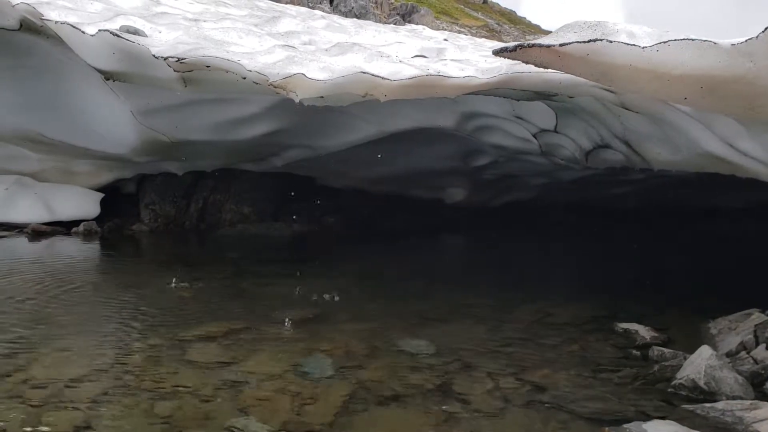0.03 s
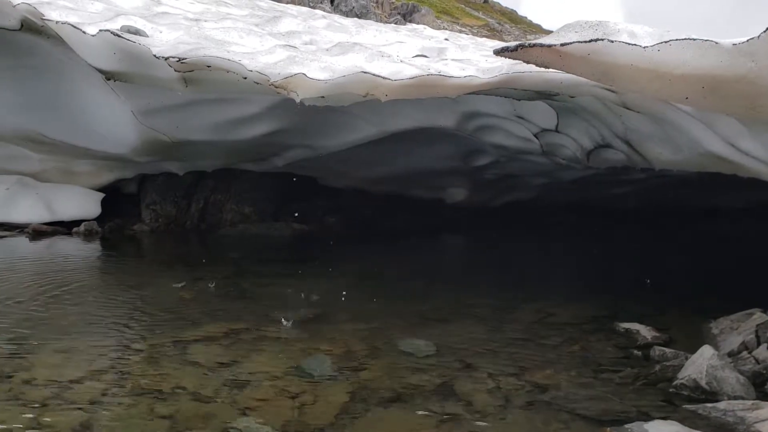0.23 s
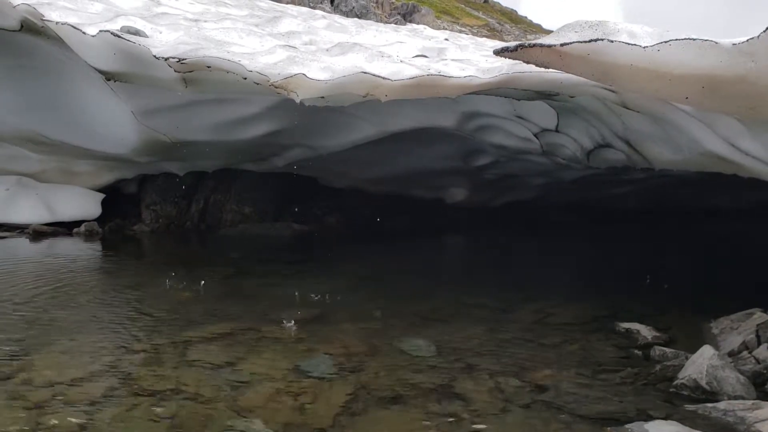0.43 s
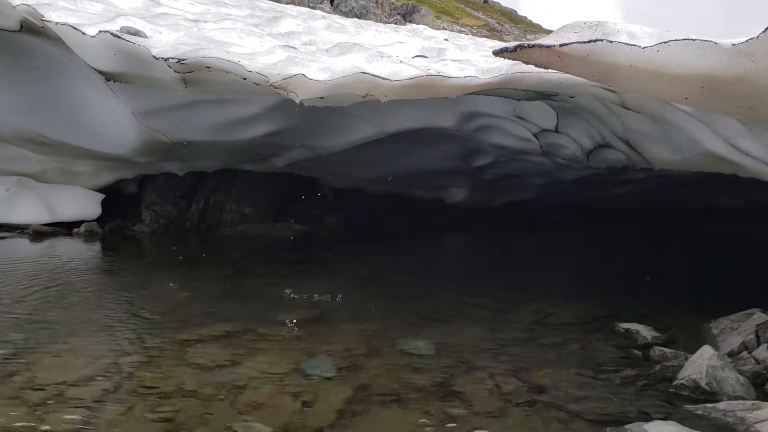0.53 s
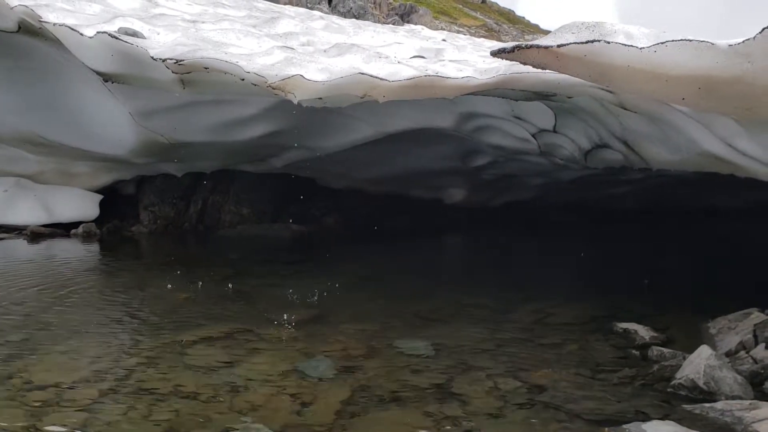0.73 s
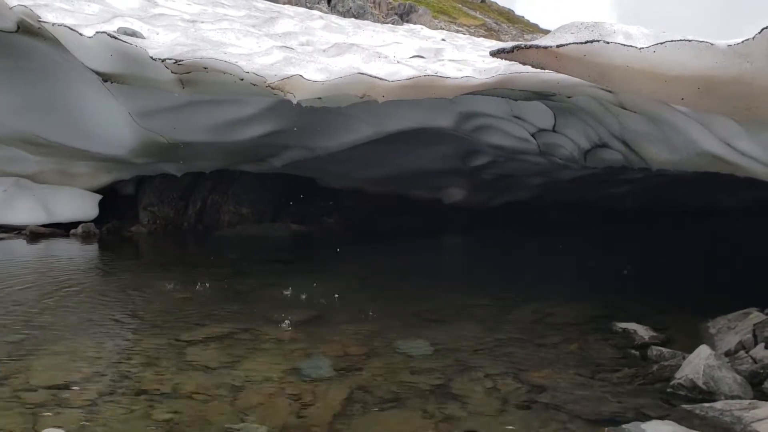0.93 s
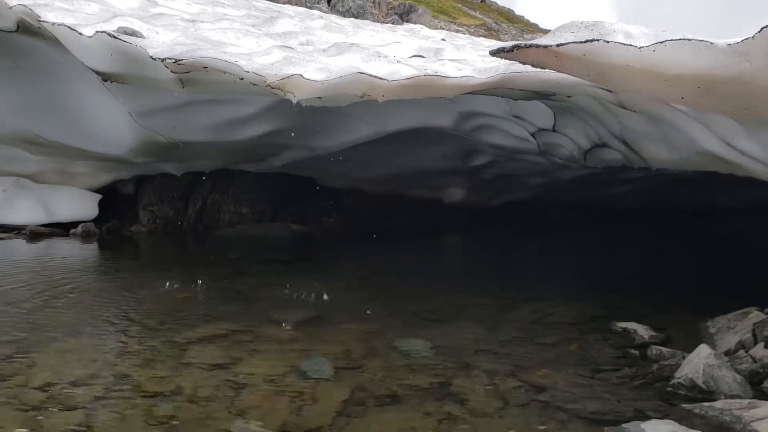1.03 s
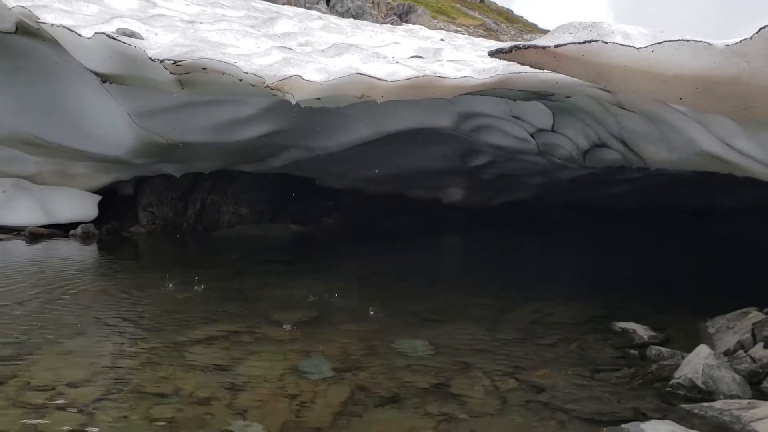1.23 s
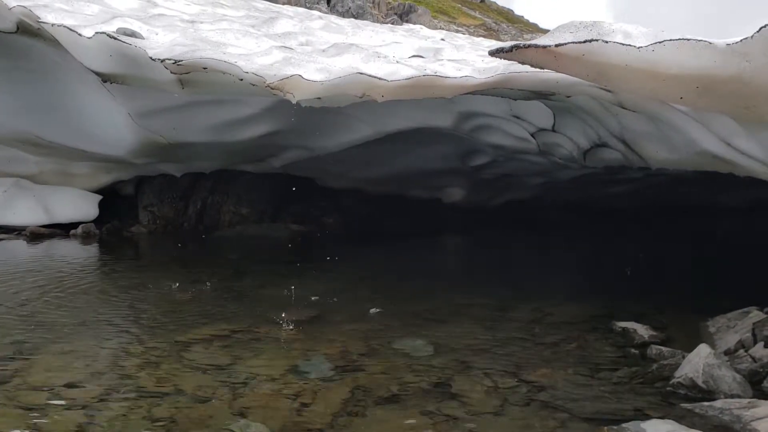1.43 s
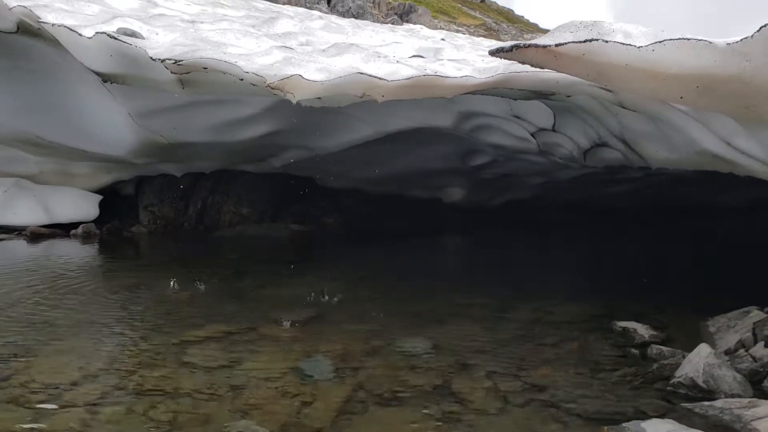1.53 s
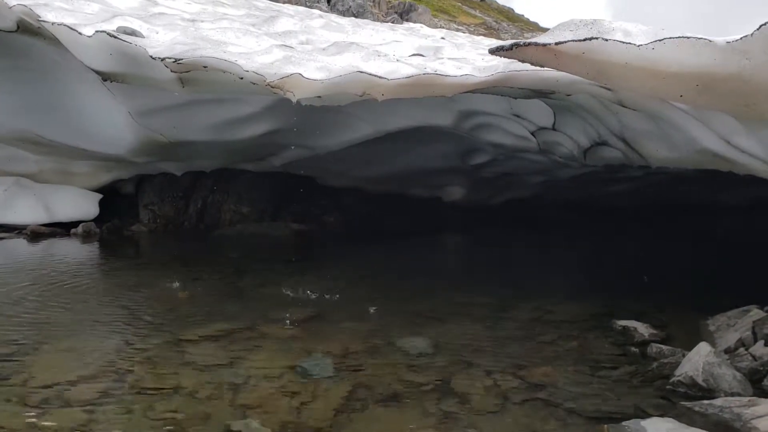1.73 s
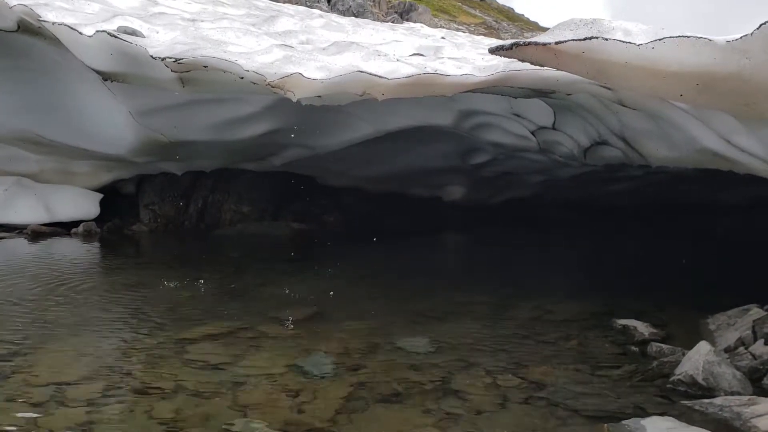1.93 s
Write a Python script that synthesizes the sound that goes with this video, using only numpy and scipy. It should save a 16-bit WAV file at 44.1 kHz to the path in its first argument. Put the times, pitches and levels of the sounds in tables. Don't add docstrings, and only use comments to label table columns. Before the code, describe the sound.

Meltwater drips steadily but irregularly into a shallow pool beneath snow. Light splashes and plinks begin at once, with a cluster near 0.3 seconds, a sharp bright slap at 0.51 and a strong splash at 0.68. Wet bubble notes follow, notably at 1.15, then smaller patters to the end. Faint distant drips and short cave echo linger; low wind buffets left near 0.35, harder right around 0.95-1.07.

```python
import sys
import numpy as np
from scipy import signal
from scipy.fft import rfft, irfft, next_fast_len
from scipy.io import wavfile
from scipy.ndimage import uniform_filter1d, map_coordinates

SR = 44100
rng = np.random.default_rng(int(sys.argv[2]) if len(sys.argv) > 2 else 0)


def gain_from_db(level_db):
    decades = np.asarray(level_db, float) / 20
    return 10 ** decades


def transcribe(signal):
    frames = np.atleast_2d(signal).T
    limited = np.clip(frames, -1, 1)
    pcm = np.round(limited * 32767).astype(np.int16)
    wavfile.write(sys.argv[1], SR, pcm)


N = 88200


def unit(x):
    return x / np.sqrt(np.mean(x ** 2, axis=-1, keepdims=True) + 1e-20)


def along(points, hz):
    f, v = np.transpose(points)
    return np.interp(np.log(hz + 1), np.log(f + 1), v)


def wobble(rate, count=N):
    points = rng.standard_normal(int(count / SR * 2000) + 4)
    return map_coordinates(points, [np.arange(count) * rate / SR])


def smoothed(x, size, axis=-1):
    return uniform_filter1d(x, size=size, axis=axis)


def filtered(x, response):
    m = next_fast_len(x.shape[-1] + 8192)
    return irfft(rfft(x, m) * response(np.fft.rfftfreq(m, 1 / SR)), m)[..., :x.shape[-1]]


def low_cut(hz, edge_hz):
    return (1j * hz / (edge_hz + 1j * hz)) ** 4


def causal(gain_db):
    c = irfft(gain_db * np.log(10) / 20)
    c[1:len(c) // 2] *= 2
    c[len(c) // 2 + 1:] = 0
    return np.exp(rfft(c))


def add(track, s, sound):
    i = round(s * SR)
    track[:, i:i + sound.shape[-1]] += sound


def far_drips():
    count, middle_hz, spread, size_db = 1500, 5500, 0.4, 3
    u, z = rng.random((count, 3)), rng.standard_normal((count, 3))
    hz = np.clip(middle_hz * np.exp(spread * z[:, :1]), 2400, 15000)
    t = np.arange(SR // 50) / SR
    life = (2 + 16 * u[:, 1:2] ** 2) / hz
    size = gain_from_db(-size_db * np.log(u[:, 2:] + 0.0084))
    plink = size * np.exp(-3 * t / life) * (1 - np.exp(-4 * t / life))
    at = ((u[:, :1] * N).astype(int) + np.arange(len(t))).ravel()
    turn = 2 * np.pi * hz * t

    def side(k):
        heard = plink * gain_from_db(k * 2 * z[:, 1:2]) * np.sin(turn + k * z[:, 2:])
        return np.bincount(at, heard.ravel(), N + SR)[:N]

    return unit(np.array([side(1), side(-0.71)]))


# (t/s, level/dB)
WASH_LEVEL = [
    (0.0, -56),
    (1.09, -57),
    (2.0, -58),
]
# (f/Hz, depth/dB)
PATCHINESS = [(1000, 3), (4500, 5), (6500, 4), (10000, 1.5)]


def wash():
    wash_db, plinks_db = -11, -6
    z = signal.stft(rng.standard_normal((2, N)), nperseg=256)[2]
    patches = smoothed(smoothed(rng.standard_normal(z.shape[1:]), 14, axis=0), 5, axis=1)
    depth_db = along(PATCHINESS, np.fft.rfftfreq(256, 1 / SR))[:, None]
    z = z * gain_from_db(depth_db * patches / patches.std())
    hiss = unit(signal.istft(z, nperseg=256)[1][:, :N])
    s, db = np.transpose(WASH_LEVEL)
    level_db = np.interp(np.arange(N) / SR, s, db) + wobble(30) + wash_db
    return gain_from_db(level_db) * (hiss + gain_from_db(plinks_db) * far_drips())


def steady(spectrum, evenness):
    x = unit(filtered(rng.standard_normal(N), lambda hz: gain_from_db(along(spectrum, hz))))
    swells = np.abs(smoothed(smoothed(x ** 2, 900), 900))
    return unit(x / (swells + 0.048) ** (evenness / 2))


# (t/s at the centre, level/dB, beat f/Hz)
GUSTS_LEFT = [(0.076, -45.0, 81), (0.177, -43.5, 63), (0.22, -41.5, 78), (0.245, -36.5, 63),
              (0.265, -40, 81.6), (0.312, -36.5, 69), (0.334, -30.5, 88.5), (0.362, -27.5, 142.5),
              (0.46, -34.5, 75), (0.505, -45.5, 71), (0.534, -38, 65.6), (0.658, -39.5, 75.3),
              (0.726, -43.5, 54), (0.93, -42.5, 60.5), (0.952, -37, 72), (0.978, -37.5, 57.3),
              (1.02, -43, 87), (1.055, -34, 77), (1.101, -32, 91), (1.143, -40, 66.4), (1.263, -42, 67),
              (1.3, -33.0, 86.7), (1.33, -35, 63.4), (1.363, -40.5, 57.5), (1.409, -36, 71.7),
              (1.581, -45.0, 63), (1.661, -44, 66), (1.703, -42.5, 61), (1.778, -37.5, 70.5),
              (1.881, -40.0, 64.2), (1.99, -41.5, 67.6)]
# (t/s at the centre, level/dB, beat f/Hz)
GUSTS_RIGHT = [(0.102, -39.5, 85.3), (0.2, -40, 81), (0.225, -29.5, 109.5), (0.243, -32.5, 102),
               (0.265, -37.5, 71.4), (0.293, -39.0, 91), (0.319, -40, 90.6), (0.532, -35.5, 86.4),
               (0.563, -41.5, 86), (0.65, -37.0, 66.7), (0.666, -37.5, 97), (0.774, -34.0, 81.8),
               (0.802, -35.0, 82), (0.827, -35.5, 85), (0.849, -33.5, 99.5), (0.937, -27.5, 85.2),
               (0.964, -23.5, 72), (0.987, -28.5, 87.7), (1.006, -34.5, 116.4), (1.027, -31, 149),
               (1.045, -23.5, 143), (1.066, -20.0, 129), (1.088, -32, 111), (1.129, -32.5, 104),
               (1.19, -37, 102), (1.213, -38.5, 95.6), (1.245, -33, 108.5), (1.27, -31.5, 95),
               (1.296, -40, 101), (1.33, -33.5, 85.6), (1.356, -35.5, 106.3), (1.395, -34.5, 92),
               (1.486, -36.5, 80), (1.524, -41, 81.4), (1.587, -32.5, 99.8), (1.61, -41.5, 97),
               (1.648, -41, 110.5), (1.814, -39.5, 95), (1.895, -42.0, 80.7)]
# (f/Hz, level/dB)
RUMBLE = [(15, -17), (50, -3), (130, -1), (200, -8), (320, -25), (500, -40), (900, -68), (2000, -114)]
# (f/Hz, level/dB)
FLUTTER = [(60, -14), (200, 7), (450, -17), (700, -29), (1200, -34.5), (2500, -45)]


def wind(gusts, flutter_db):
    lull_db, strong_db = -52, -26
    eddy_s, glide = 0.013, 8
    swirl_db, churn_db = -3, -6
    speedup = 0.23
    flutter_grows, flutter_beat_power = 1.28, 1.88
    s, d, hz = np.transpose(gusts)[:, :, None]
    t, chance = np.arange(N) / SR - s, rng.random((len(s), 2))

    swell = gain_from_db(d - 4 * t ** 2 * hz / 100 / eddy_s ** 2)
    turn = hz * t * (1 + glide * (2 * chance[:, :1] - 1) * t) + chance[:, 1:]
    swirl = np.sum(swell * np.sqrt(2) * np.sin(2 * np.pi * turn), axis=0)

    db = 10 * np.log10(gain_from_db(2 * lull_db) + np.sum(swell ** 2, axis=0))
    speed = gain_from_db(speedup * (db - strong_db))
    rumble = map_coordinates(steady(RUMBLE, evenness=0.85), [np.cumsum(speed)], mode="mirror")
    churn = np.sqrt(gain_from_db(2 * lull_db) + gain_from_db(2 * (db + churn_db)))

    flutter = gain_from_db(strong_db + flutter_db + flutter_grows * (db - strong_db) + 3.35 * wobble(60))
    lull = gain_from_db(lull_db)
    beat = (np.sum(swell * hz / 100, axis=0) + lull) / (np.sum(swell, axis=0) + lull)
    flutter = flutter * beat ** flutter_beat_power
    return gain_from_db(swirl_db) * swirl + churn * rumble + flutter * steady(FLUTTER, evenness=0.2)


# (t/s, level/dB, f/Hz)
BUBBLES = [(.055, -63, 980), (.08, -57.5, 1204), (.135, -57, 1222), (.461, -54.5, 1750), (.462, -63.5, 750),
           (.526, -55, 1014), (.708, -61, 1318), (.754, -62, 908), (.793, -46, 1612), (.806, -59, 1650),
           (.837, -65, 1640), (.938, -59, 818), (1.156, -54.5, 988), (1.184, -48.5, 1054),
           (1.265, -50, 1732), (1.27, -62, 950), (1.378, -66, 1200), (1.476, -59.5, 1215),
           (1.589, -48.5, 1636), (1.638, -57, 934), (1.762, -54, 938), (1.898, -59, 930)]
# (t/s, level/dB, f/Hz)
MORE_PLINKS = [(.084, -55, 2346), (.136, -55, 2440), (.536, -48.5, 3110), (1.1538, -39, 2436),
               (1.1538, -46.5, 2850), (1.249, -46, 2800), (1.3763, -46, 2680), (1.4144, -53, 2504),
               (1.5434, -49.5, 3570), (1.5658, -53.5, 3460), (1.8756, -50, 4000), (1.94, -51, 3230),
               (.11, -57.5, 937), (1.92, -58.5, 1267), (.325, -39.5, 4555), (.618, -38, 4090),
               (.262, -55.5, 2334), (.68, -32.5, 5940), (1.289, -53.5, 3470), (.821, -43.5, 5085),
               (1.036, -48.5, 5700), (1.654, -44, 4900)]


def bubbles():
    bubble_db, rise_per_s, start_s, cycles = 3, 4.5, 0.002, 60
    blur_db, blur_rad = 3, 1.6
    track, t = np.zeros((2, N + SR)), np.arange(SR // 5) / SR
    for s, db, hz in list(BUBBLES) + list(MORE_PLINKS):
        blur = np.array([wobble(113, count=len(t)), wobble(155, count=len(t))])
        turn = 2 * np.pi * hz * (t + rise_per_s * t ** 2 / 2) + blur_rad * blur
        ring_db = db + bubble_db - 60 * t * hz / cycles + blur_db * wobble(220, count=len(t))
        add(track, s, gain_from_db(ring_db) * (1 - np.exp(-t / start_s)) * np.sin(turn))
    return track[:, :N]


# (t/s, peak level/dB)
SLAPS = [(.0762, -40), (.205, -38), (.2625, -40), (.3258, -34), (.4635, -38), (.5108, -24), (.5117, -15),
         (.5153, -28), (.6802, -21), (.682, -31), (1.0645, -30), (1.265, -37), (1.545, -36), (1.5655, -40),
         (1.608, -40), (1.741, -38)]


def slaps():
    slap_db, fade_s, lowest_hz = -6.5, 0.0017, 4000
    track, t = np.zeros((2, N + SR)), np.arange(SR // 4) / SR
    for s, db in SLAPS:
        slap = gain_from_db(db + slap_db - 60 * t / fade_s) * np.sign(rng.standard_normal(len(t)))
        add(track, s, filtered(slap, lambda hz: low_cut(hz, lowest_hz)))
    return track[:, :N]


# (t/s, peak level/dB, treble level/dB, lowest f/Hz)
SPLASHES = [(0.0766, -30, -16, 4500), (0.127, -36.5, -8, 3500), (0.2244, -46, -10, 4000),
            (0.263, -37, -11.5, 3070), (0.308, -29, -19, 4000), (0.3137, -24.5, -20.5, 4000),
            (0.323, -29, -31, 3350), (0.358, -35, -17, 2830), (.404, -51, -16, 2400),
            (.463, -34.5, -13, 2270), (0.5094, -37, 0, 4440), (.541, -24, -16.5, 4000),
            (0.617, -33, -14, 3280), (.679, -18, -18.5, 4570), (.712, -25.5, -19, 4470),
            (0.774, -43, -22, 2180), (.793, -31, -19, 1850), (0.821, -24.5, -16.5, 3730),
            (0.897, -37, -12.5, 4500), (0.941, -32.5, -19, 3920), (.957, -32.5, -14.5, 3530),
            (1.0618, -27.5, -19, 2780), (1.115, -30.5, -9, 2780), (1.211, -35.5, -14.5, 3740),
            (1.249, -33.5, -16, 2380), (1.265, -32, -13.5, 2300), (1.286, -32, -14, 2900),
            (1.334, -36.5, -15.5, 4000), (1.41, -32.5, -18, 1970), (1.455, -38, -11, 3480),
            (1.477, -34.5, -15.5, 3500), (1.521, -37, -13, 3300), (1.564, -32.5, -15, 3280),
            (1.587, -31.5, -13.5, 3800), (1.607, -30.5, -20.5, 4000), (1.653, -34.5, -30, 3770),
            (1.74, -35, -12.5, 3040), (1.756, -32.5, -15, 3120), (1.807, -43, -20, 4000),
            (1.83, -38, -19.5, 2300), (1.875, -33.5, -20.5, 3200), (1.898, -40.5, -7, 4500),
            (1.93, -36, -21, 4000), (1.94, -33, -19.5, 2730), (1.973, -38.5, -19, 5000)]


def splashes():
    spray_db, fade_s, start_s, clump_db = -13, 0.071, 0.002, 4
    pan_db, treble_from_hz, more_treble_db = 3.5, 8250, 4
    track, t = np.zeros((2, N + SR)), np.arange(SR // 4) / SR
    smooth = gain_from_db(spray_db - 60 * t / fade_s) * (1 - np.exp(-t / start_s))
    for s, db, treble_db, low_hz in SPLASHES:
        same, own = rng.standard_normal(len(t)), rng.standard_normal((2, len(t)))
        clumps = gain_from_db(clump_db * wobble(390, count=len(t)))
        spray = unit(smooth * clumps) * np.sqrt(np.mean(smooth ** 2))
        pan = gain_from_db(pan_db * rng.uniform(-1.37, 1) * np.array([[0.5], [-0.5]]))

        def colour(hz):
            dull = 1 / (1 + 1j * hz / treble_from_hz) ** 3
            return low_cut(hz, low_hz) * (dull + gain_from_db(treble_db + more_treble_db) * (1 - dull))

        add(track, s, gain_from_db(db) * pan * filtered(spray * (1.19 * same + 1.49 * own), colour))
    return track[:, :N]


# (f/Hz, time/s)
CAVE_FADE = [(500, 0.24), (3000, 0.23), (12000, 0.15)]


def cave(x):
    delay_s, build_s = 0.006, 0.015
    hz, t, z = signal.stft(rng.standard_normal((2, SR // 3)), SR, nperseg=256)
    fade = gain_from_db(-60 * t / along(CAVE_FADE, hz)[:, None]) * (1 - np.exp(-t / build_s))
    tail = signal.istft(z * fade, SR, nperseg=256)[1]
    late = np.pad(x, ((0, 0), (round(delay_s * SR), 0)))
    return signal.fftconvolve(late, tail / np.linalg.norm(tail[0]), axes=1)[:, :N]


# (f/Hz, level/dB)
BODY = [(200, -12), (550, -3.5), (1000, -5), (1500, -1), (2100, -6), (2400, 3), (16000, 6.5)]
# (f/Hz, level/dB)
PORT_LEFT = [(2400, 7.5), (2900, 0.5), (4500, 0), (6000, 0.5), (7300, 8.5), (8800, -4.5), (13000, 12),
             (16000, 4.5)]
# (f/Hz, level/dB)
PORT_RIGHT = [(2400, 5.5), (4000, 8.5), (5600, 17), (6250, 11.5), (6750, -29), (7400, 8.5), (9500, 1.5),
              (14500, -8.5)]


def ports(x):
    def ear(port, late_s):
        return lambda hz: causal(along(BODY, hz) + along(port, hz)) * np.exp(-2j * np.pi * hz * late_s)

    return np.array([filtered(x[0], ear(PORT_LEFT, 0)), filtered(x[1], ear(PORT_RIGHT, 0.00017))])


def scene():
    spray = splashes() + slaps()
    plinks = bubbles()
    gusts = np.array([wind(GUSTS_LEFT, flutter_db=-23.5), wind(GUSTS_RIGHT, flutter_db=-11.5)])
    echo = cave(gain_from_db(-12) * spray + gain_from_db(-11) * plinks)
    return ports(spray + plinks + echo + wash()) + gusts


def roll_off(x):
    return signal.sosfilt(signal.butter(12, 16860, fs=SR, output="sos"), x)


def record(dry):
    steady_top_hz, top_hz, opens_db = 15850, 16650, -44
    top = filtered(dry, lambda hz: (hz >= steady_top_hz) & (hz < top_hz))
    sharp = np.abs(smoothed(top[0] ** 2, 200)) > gain_from_db(2 * opens_db)
    kept = filtered(dry, lambda hz: hz < steady_top_hz) + top * smoothed(1.0 * sharp, 120)
    return roll_off(kept)


dry = scene()
out = record(dry)
transcribe(out)
```